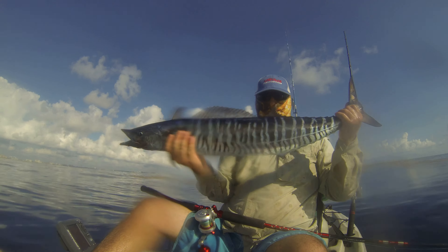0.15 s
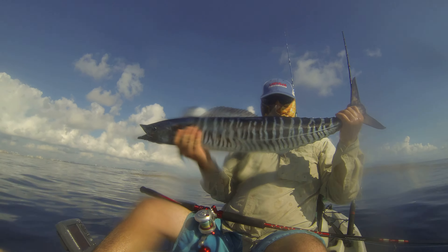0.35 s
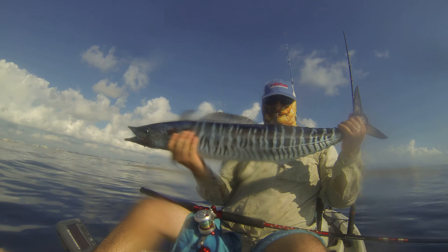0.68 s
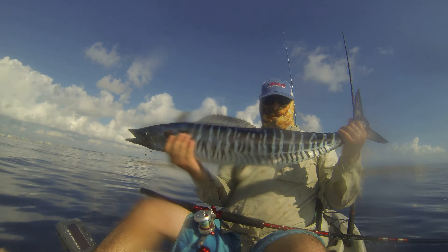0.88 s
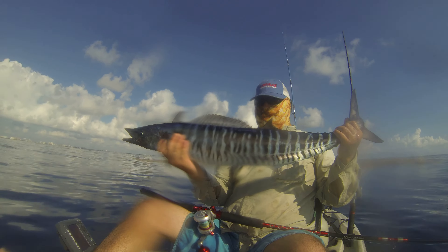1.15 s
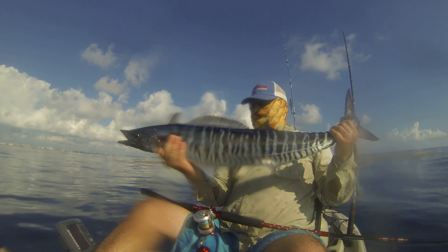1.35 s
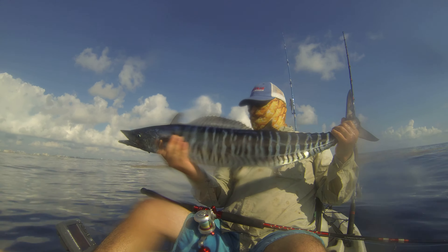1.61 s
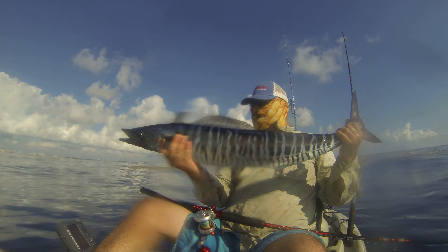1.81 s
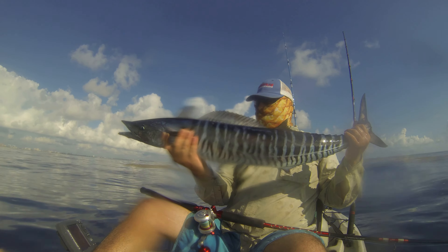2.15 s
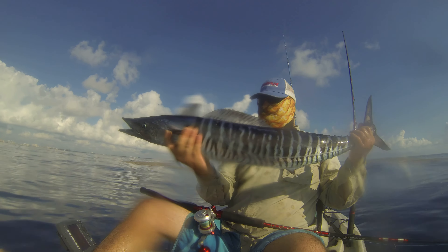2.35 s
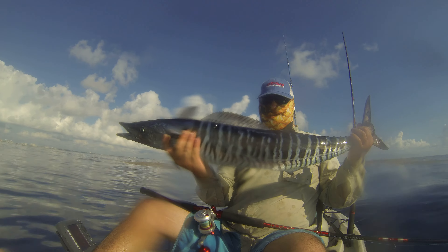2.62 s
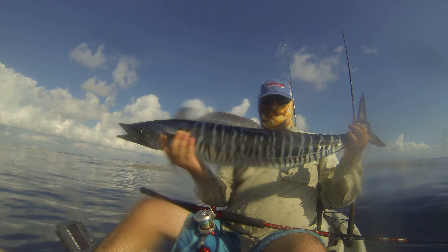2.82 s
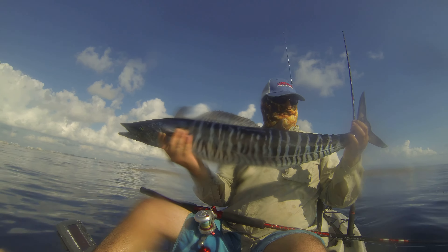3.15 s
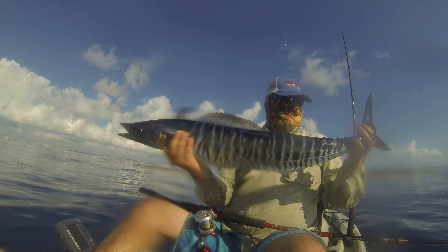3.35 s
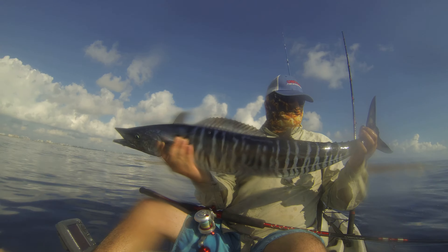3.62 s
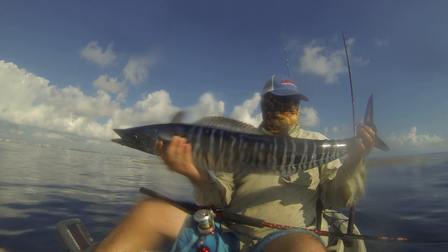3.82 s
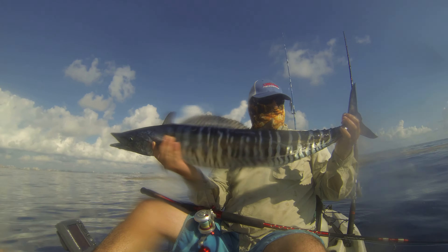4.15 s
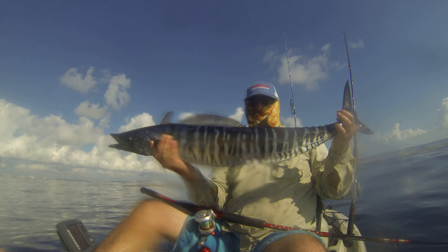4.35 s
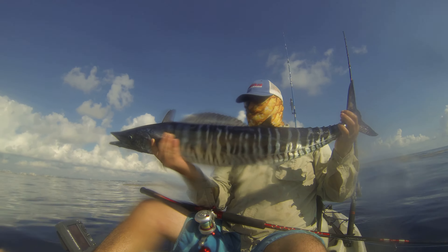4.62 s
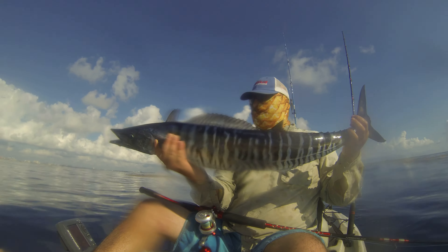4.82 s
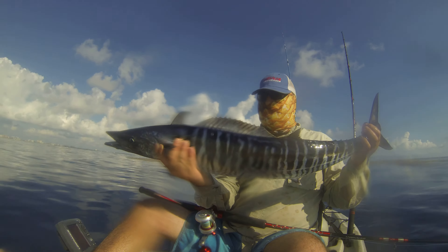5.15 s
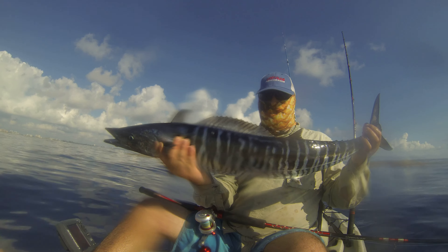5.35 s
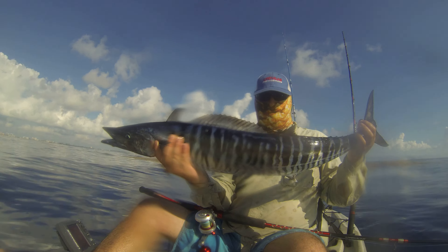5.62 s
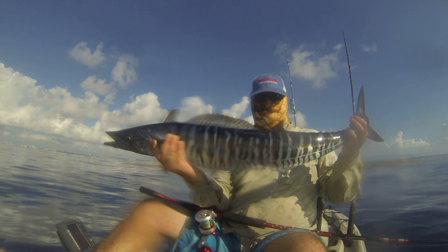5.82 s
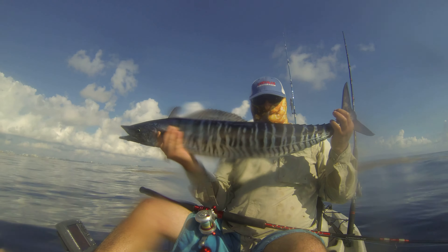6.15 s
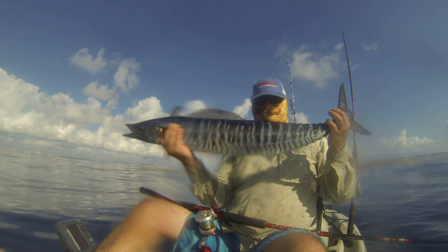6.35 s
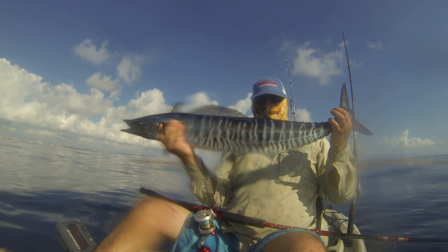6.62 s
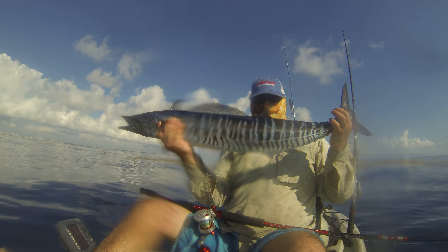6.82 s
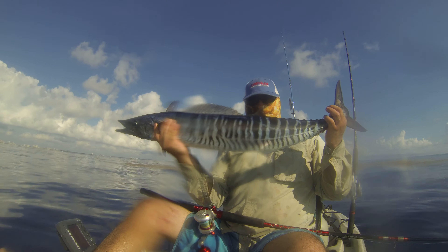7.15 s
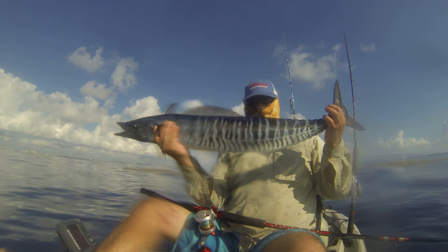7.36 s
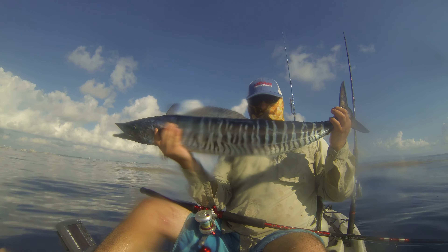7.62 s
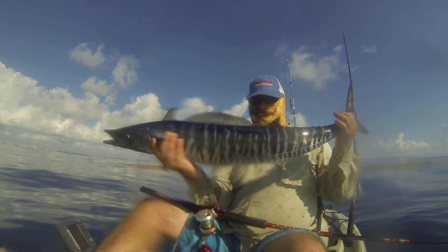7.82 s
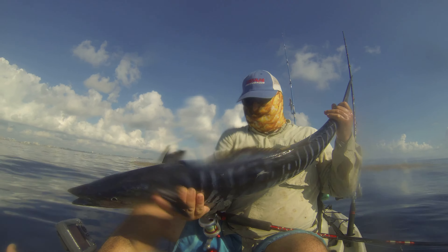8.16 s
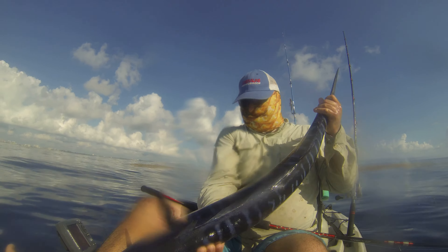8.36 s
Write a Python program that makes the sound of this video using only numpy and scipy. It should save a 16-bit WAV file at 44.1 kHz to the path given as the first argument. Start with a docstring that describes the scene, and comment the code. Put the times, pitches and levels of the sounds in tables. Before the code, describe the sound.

Close, muffled, contact-like sound on a small boat on calm open sea. Deep hum around the bottom of hearing swells and sinks, with soft dull lapping. Light gear knocks open the scene; in the middle, low hollow booms with short plastic clacks tumble together, then recur singly. Later it is quiet except for one crisp knock and faint bubbles. Thin electronic hiss with a fast-pulsing high whine persists.

```python
"""Bumps make a plastic kayak's hollow hull boom and its panels knock: decaying modes, scuffed on contact.
A sealed camera housing on the hull hears it drift on a calm sea; shaped noise sways and laps dully,
bubbles plop as rising tones, and a low engine-like hum sums harmonics of one wandering speed.
The camera's electronics add noise hiss, a whine of paired sine bursts and a soft rasp."""
import sys
import numpy as np
from scipy import signal
from scipy.fft import rfft, irfft, next_fast_len
from scipy.io import wavfile
from scipy.ndimage import uniform_filter1d

SR = 44100
rng = np.random.default_rng(int(sys.argv[2]) if len(sys.argv) > 2 else 0)


def store_pcm(level_fs):
    """Save levels as 16-bit WAV."""
    pcm = np.round(np.clip(level_fs, -1, 1) * 32767).astype(np.int16)
    wavfile.write(sys.argv[1], SR, np.atleast_2d(pcm).T)


N = 374380


def from_db(db):
    """Decibels to amplitude gain."""
    return 10 ** (np.asarray(db) / 20)


def rms_one(x):
    """Scale to unit rms."""
    return x / np.sqrt(np.mean(x ** 2) + 1e-20)


def peak_at(x, peak_db):
    """Scale to a peak level."""
    return from_db(peak_db) * x / np.max(np.abs(x))


def in_time(rows):
    """Interpolate a (time, value) curve to every sample."""
    time_s, value = np.transpose(rows)
    return np.interp(np.arange(N) / SR, time_s, value)


def drift(rate_hz):
    """Slow random wander of unit rms: noise through two equal poles, computed at SR / 40."""
    step, warmup = 40, 2000
    pole = np.exp(-2 * np.pi * rate_hz * step / SR)
    noise = rng.standard_normal(N // step + 2 + warmup)
    slow = signal.lfilter([1], [1, -2 * pole, pole ** 2], noise)[warmup:]
    return np.interp(np.arange(N) / step, np.arange(len(slow)), rms_one(slow))


def coloured(x, spectrum):
    """Filter to a spectrum, silent outside its range; unit rms."""
    hz, db = np.transpose(spectrum)
    size = next_fast_len(N)
    bins_hz = np.maximum(np.fft.rfftfreq(size, 1 / SR), 1)
    gain_db = np.interp(np.log(bins_hz), np.log(hz), db, left=-np.inf, right=-np.inf)
    return rms_one(irfft(rfft(x, size) * from_db(gain_db), size)[:N])


def low_pass(x, hz, order):
    """Causal Butterworth low-pass."""
    return signal.sosfilt(signal.butter(order, hz, fs=SR, output="sos"), x)


def add(out, time_s, sound):
    """Mix a sound in, cut at the end of the scene."""
    at = round(time_s * SR)
    out[at:at + len(sound)] += sound[:N - at]


# hiss spectrum: (frequency [Hz], relative density [dB])
HISS_SPECTRUM = [(300, 4), (1000, 7), (1600, 2), (2600, -1.5), (3250, 0.5), (3800, -4.5), (5500, -7.5),
                 (7500, -10), (9000, -13.5), (13000, -17.5), (15500, -19)]
# whine bursts in each cycle: (start [s], end [s], mean frequency [Hz], fundamental rms level [dB])
WHINE_BURSTS = [(0.0304, 0.0468, 7477, -74.5), (0.0487, 0.0658, 7450, -73.3)]


def electronics(hiss_db=-66.5, cycles_per_s=14.983, octave_db=-2.0,
                rasp_db=-82, rasp_hz=3300, rasp_width_hz=550):
    """Noise hiss; gated sine pairs an octave apart; band-passed noise swelling before each burst pair."""
    in_cycle_s = np.arange(N) / SR % (1 / cycles_per_s)
    out = from_db(hiss_db) * coloured(rng.standard_normal(N), HISS_SPECTRUM)
    for start_s, end_s, hz, db in WHINE_BURSTS:
        is_on = (in_cycle_s > start_s) & (in_cycle_s < end_s)
        gate = uniform_filter1d(is_on.astype(float), size=40)   # softens the switching
        phase = 2 * np.pi * np.cumsum(hz + 6 * drift(10)) / SR
        tone = np.sin(phase) + from_db(octave_db) * np.sin(2 * phase)
        out += np.sqrt(2) * from_db(db) * gate * tone
    before_bursts = in_cycle_s < WHINE_BURSTS[0][0]
    rasp_level = np.sqrt(in_cycle_s) * before_bursts * from_db(2.5 * drift(25))
    edges_hz = [rasp_hz - rasp_width_hz / 2, rasp_hz + rasp_width_hz / 2]
    band = signal.butter(2, edges_hz, "band", fs=SR, output="sos")
    rasp = signal.sosfilt(band, rng.standard_normal(N) * rasp_level)
    return out + from_db(rasp_db) * rms_one(rasp)


# mean hum speed: (time [s], fundamental [Hz])
HUM_SPEED_HZ = [(0, 44.8), (2.5, 43.7), (5.5, 43.9), (7.0, 44.5), (8.49, 43.3)]
# hum level, followed in full by harmonic 2 only: (time [s], level [dB])
HUM_LEVEL_DB = [(0, -38), (0.8, -49.5), (1.08, -37), (1.6, -43.5), (2.7, -43.5), (3.55, -55.5), (4.0, -36),
                (4.8, -44.5), (6.3, -44.5), (6.95, -36), (7.6, -42.5), (8.49, -43.5)]
# hum harmonics: (multiple of the fundamental [1], level relative to the hum [dB])
HUM_HARMONICS = [(1, -3.5), (2, 3), (3, -8), (4, -22.5), (5, -21.5), (6, -42), (7, -22.5), (8, -24.5),
                 (9, -29.5), (10, -30.5), (11, -31), (12, -31.5), (13, -37), (14, -30), (15, -55),
                 (16, -37.5)]
# singing of harmonic 10: (time [s], added level [dB])
HUM_SINGING_DB = [(0, -36), (1.75, 11), (1.95, 10.5), (2.4, 9), (2.6, 1.5), (7.0, 0.5), (7.4, 4),
                  (7.8, 12.5), (8.49, -3)]


def hum(others_follow=0.18, jitter=0.00225, faint_db=-40, faint_fall_db_per_octave=6):
    """Harmonics of one wandering speed; only the second, on the hull's boom, follows the full level curve."""
    level_db, singing_db = in_time(HUM_LEVEL_DB), in_time(HUM_SINGING_DB)
    speed_hz = in_time(HUM_SPEED_HZ) * (1 + jitter * drift(2.02))
    phase = 2 * np.pi * np.cumsum(speed_hz) / SR
    mean_db = level_db.mean()
    calm_db = mean_db + others_follow * (level_db - mean_db)
    last = len(HUM_HARMONICS)
    faint = [(k, faint_db - faint_fall_db_per_octave * np.log2(k / last))
             for k in range(last + 1, 2 * last - 2)]
    out = np.zeros(N)
    for multiple, db in list(HUM_HARMONICS) + faint:
        k = round(multiple)
        if k == 2:
            swell_db = level_db
        else:
            swell_db = calm_db + 1.9 * drift(2) + singing_db * (k == 10)
        out += from_db(db + swell_db) * np.sin(k * phase + 2 * np.pi * rng.random())
    return out


def rocking(t60_s=1.8):
    """How hard the hull rocks: thump boom energies add up and die away."""
    energy, t = np.zeros(N), np.arange(N) / SR
    for time_s, boom_db, *_ in THUMPS:
        add(energy, time_s, from_db(boom_db - 60 * t / t60_s) ** 2)
    return np.sqrt(energy)


# sway spectrum: (frequency [Hz], relative density [dB])
SWAY_SPECTRUM = [(10, -8), (15, -0.5), (28, -9.5), (36, -4.5), (48, -8.5), (60, -3.5), (78, -14.5),
                 (100, 1), (135, -17.5), (170, -21.5), (300, -53.5)]
# lapping spectrum: (frequency [Hz], relative density [dB])
LAP_SPECTRUM = [(130, -3), (190, -1), (240, 2.5), (320, 0.5), (400, -4), (470, -7), (620, -7.5),
                (850, -14.5), (1000, -5.5), (1120, -26), (1240, -10), (1500, -42), (2500, -52.5)]
# swell's deep sway: (time [s], level before sway_gain_db [dB])
SWELL_DB = [(0, -54), (1.1, -50.5), (1.65, -46), (2.15, -58.5), (3.6, -55.5), (4.4, -52), (5.1, -50),
            (5.5, -53.5), (6.1, -46.5), (6.5, -55.5), (8.49, -51.5)]
# ripples lapping at the hull: (time [s], level before patchiness and rocking [dB])
RIPPLE_DB = [(0, -55.5), (0.6, -63.5), (1.5, -60.5), (2.1, -63), (3.6, -60), (4.8, -64.5), (5.55, -58.5),
             (6.35, -64), (6.8, -62.5), (8.49, -62.5)]


def sea(sway_gain_db=6.0, sway_waver_db=1.2, laps_per_s=90, grain_db=-6, patchy_db=2.5,
        rock_sway_db=-29.5, rock_lap_db=-51.5):
    """Swell sways the hull as deep noise; ripples lap as dull grainy noise; rocking adds power to both."""
    rock = rocking()
    swell_db = in_time(SWELL_DB) + sway_gain_db + sway_waver_db * drift(1.7)
    sway_level = np.hypot(from_db(swell_db), from_db(rock_sway_db) * rock)
    lap_level = np.hypot(from_db(in_time(RIPPLE_DB)), from_db(rock_lap_db) * rock)
    sway = sway_level * coloured(rng.standard_normal(N), SWAY_SPECTRUM)
    grains = (rng.random(N) < laps_per_s / SR) * rng.standard_normal(N)
    wash = rng.standard_normal(N) + from_db(grain_db) * rms_one(grains)
    patches = from_db(patchy_db * drift(29))
    return sway + lap_level * patches * coloured(wash, LAP_SPECTRUM)


# bubbles beside the hull: (time [s], starting frequency [Hz], peak level [dB], t60 [s])
PLOPS = [(2.586, 797, -51.5, 0.059), (2.692, 560, -52.5, 0.15), (2.773, 268, -47.5, 0.046),
         (5.373, 453, -50, 0.033), (5.406, 470, -54, 0.043), (5.494, 486, -56, 0.044),
         (8.110, 567, -53.5, .08), (8.140, 650, -57, 0.059)]


def plops(rise_per_s=3.52, swell_s=0.003):
    """A bubble's decaying note rises linearly as it nears the surface."""
    out, t = np.zeros(N), np.arange(SR // 8) / SR
    for time_s, hz, db, t60_s in PLOPS:
        shape = (1 - np.exp(-t / swell_s)) * np.exp(-np.log(1000) * t / t60_s)
        note = np.sin(2 * np.pi * hz * (t + rise_per_s * t ** 2 / 2))
        add(out, time_s, peak_at(shape * note, db))
    return out


def struck(modes, spread_db, detune, travel_s):
    """Half a second of decaying modes, alternating in sign; strength and pitch vary per blow."""
    hz, db, t60_s = np.transpose(modes)[:, :, None]
    late_s = travel_s * (np.sqrt(SHELL_MODES[-1][0] / hz) - 1)   # low bending waves travel slower
    t = np.maximum(np.arange(SR // 2) / SR - late_s, 0)
    strength, shift = rng.standard_normal((2, len(modes), 1))
    signs = -(-1) ** np.arange(len(modes))[:, None]
    level = signs * from_db(db + spread_db * strength)
    fall = np.exp(-np.log(1000) * t / t60_s)
    tones = np.sin(2 * np.pi * hz * (1 + detune * shift) * t)
    return np.sum(level * fall * tones, axis=0)


# hull cavity modes: (mean frequency [Hz], relative level [dB], t60 [s])
CAVITY_MODES = [(60.4, -0.5, 0.35), (80, 6, 0.069), (99.9, 8, 0.13), (144.7, -8, 0.2)]


def boom(peak_db, centre_hz, focus_db=8.0, soft_hz=172, lowest_hz=50):
    """A push rings the hull's cavity; its length favours modes near centre_hz."""
    cavity = np.array(CAVITY_MODES, float)
    cavity[:, 1] -= focus_db * np.log2(cavity[:, 0] / centre_hz) ** 2
    ring = low_pass(struck(cavity, spread_db=3.0, detune=0.003, travel_s=0), soft_hz, order=6)
    # the hull cannot radiate the deepest bass
    high_pass = signal.butter(3, lowest_hz, "high", fs=SR, output="sos")
    return peak_at(signal.sosfilt(high_pass, ring), peak_db)


def nudges(per_s=1.2, mean_db=-35.5, spread_db=2, centre_hz=112):
    """Small shifts of weight: faint booms at random moments."""
    out = np.zeros(N)
    for at in np.flatnonzero(rng.random(N) < per_s / SR):
        add(out, at / SR, boom(mean_db + spread_db * rng.standard_normal(), centre_hz))
    return out


def scuffed(ring, length_s, evenness=0.83):
    """Contact scuffs briefly as it lands: a noise force with a nearly even spectrum."""
    t = np.arange(SR // 20) / SR
    noise = rng.standard_normal(len(t)) * np.sqrt(t) * np.exp(-t / length_s)
    slip = rfft(noise, 4 * len(t))
    force = irfft(slip / np.abs(slip) ** evenness)[:len(t)]
    return signal.fftconvolve(ring, force)[:len(ring)]


# plastic shell modes: (mean frequency [Hz], relative level [dB], t60 [s])
SHELL_MODES = [(226.2, -5.5, 0.23), (244.2, 2, 0.074), (299.7, -9.5, 0.21), (328, -1.5, 0.098),
               (377, -10, 0.038), (475.3, -9.5, 0.14), (585, -2, 0.071), (630, -7.5, 0.018),
               (730.6, -7.5, 0.095), (814, -10, 0.071), (901.8, -5.5, 0.064), (1006, 4.5, 0.04),
               (1183, -13.5, 0.055), (1262, -10, 0.039), (1300, -0.5, 0.028), (1595, -18.5, 0.0085)]


def clack(panel_db, tilt_db_per_octave, edge_db, edge_above_hz=900,
          panel_hz=1000, housing_hz=1550, travel_s=0.00272):
    """A contact rings the shell: panel modes below edge_above_hz, hard-edge modes from there up."""
    shell = np.array(SHELL_MODES, float)
    is_edge = shell[:, 0] >= edge_above_hz
    panel_modes, edge_modes = shell[~is_edge], shell[is_edge]
    panel_modes[:, 1] += tilt_db_per_octave * np.log2(panel_modes[:, 0] / panel_modes[0, 0])
    panel = scuffed(struck(panel_modes, spread_db=2.0, detune=0.018, travel_s=travel_s), length_s=0.0029)
    edge = scuffed(struck(edge_modes, spread_db=6.0, detune=0.022, travel_s=travel_s), length_s=0.0024)
    panel = peak_at(low_pass(panel, panel_hz, order=4), panel_db)
    edge = peak_at(low_pass(edge, housing_hz, order=6), edge_db)
    return panel + edge


def by_hardness(soft, hard, hardness):
    """Interpolate from a soft to a hard contact."""
    return soft + (hard - soft) * hardness


def bump(out, time_s, boom_db, centre_hz, knock, settle_db, settle_s=0.0399, settle_pitch=0.88):
    """Boom and knock together, then a weaker, deeper boom as whatever landed settles."""
    add(out, time_s, boom(boom_db, centre_hz))
    add(out, time_s, knock)
    add(out, time_s + settle_s, boom(boom_db + settle_db, centre_hz * settle_pitch))


# heavy padded thumps:
# (time [s], boom peak [dB], boom centre [Hz], panel peak [dB], hardness [0-1])
THUMPS = [(3.8, -12, 80, -30, 0.76), (4.1619, -10.5, 87, -30.5, 0.44), (4.1817, -11, 135, -37, 0.84),
          (4.2009, -10.5, 95.4, -44, .05), (4.2352, -24, 94, -39, .85), (4.265, -15, 63.2, -38, .62),
          (4.292, -12.5, 58.4, -47, 0.7), (4.3129, -20.5, 117.6, -32.5, .6),
          (4.446, -17.5, 107.4, -47.5, 0.1), (4.585, -8.5, 96, -27.5, 0.76), (4.968, -11.5, 91, -38.5, 0.5),
          (5.7289, -24.5, 98.7, -53, .3), (5.833, -14.5, 105, -33.5, 0.58), (6.051, -11, 125, -34.5, 0.2)]
# light sharp knocks of gear: (time [s], panel peak [dB], hardness [0-1], boom peak [dB])
KNOCKS = [(0.194, -34.5, 0.35, -25), (0.264, -33.5, 0.55, -30), (0.317, -33.5, 0.54, -30.5),
          (0.900, -38.5, 0, -39), (1.106, -36.5, 0.63, -34.5), (5.07, -46, 0.3, -33),
          (5.663, -40.5, 0.36, -35), (5.705, -46, 0.2, -48), (7.905, -27.5, 0.97, -27.5)]


def hull(knock_boom_hz=123):
    """Thumps are mostly boom, knocks carry more shell; hardness sets edge level and panel tilt."""
    out = np.zeros(N)
    for time_s, boom_db, centre_hz, panel_db, hardness in THUMPS:
        tilt_db_per_octave = by_hardness(-13, -5.5, hardness)
        edge_db = panel_db + by_hardness(-26.5, 0, hardness)
        knock = clack(panel_db, tilt_db_per_octave, edge_db)
        bump(out, time_s, boom_db, centre_hz, knock, settle_db=-19)
    for time_s, panel_db, hardness, boom_db in KNOCKS:
        tilt_db_per_octave = by_hardness(2, 4, hardness)
        edge_db = panel_db + by_hardness(-19, -0.5, hardness)
        knock = clack(panel_db, tilt_db_per_octave, edge_db)
        bump(out, time_s, boom_db, knock_boom_hz, knock, settle_db=-6)
    return out


def scene():
    """Sum all sources into one channel."""
    return (electronics() + hum() + sea() + plops() + nudges() + hull())[None]


def record(dry, cutoff_hz=15700):
    """Cut the top steeply with an elliptic low-pass."""
    return signal.sosfilt(signal.ellip(10, 0.1, 80, cutoff_hz, fs=SR, output="sos"), dry)


dry = scene()
out = record(dry)
store_pcm(out)
```